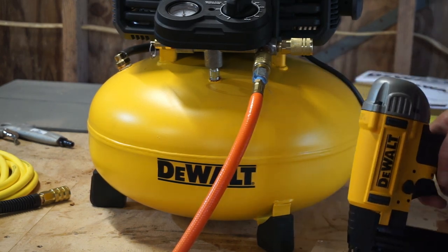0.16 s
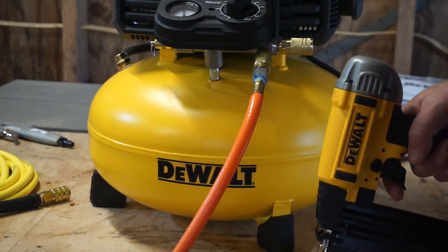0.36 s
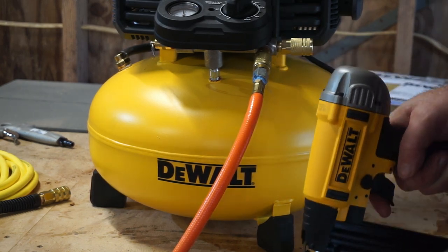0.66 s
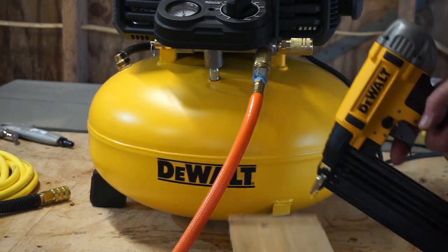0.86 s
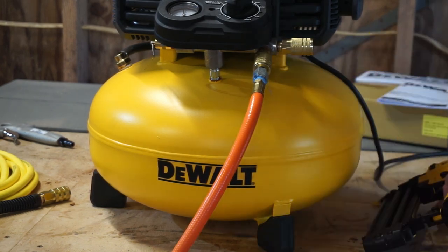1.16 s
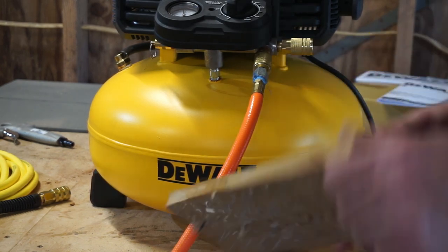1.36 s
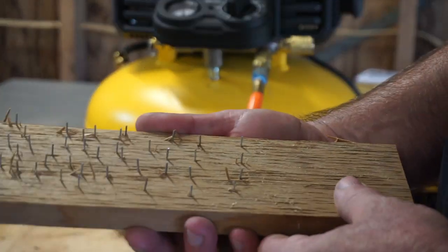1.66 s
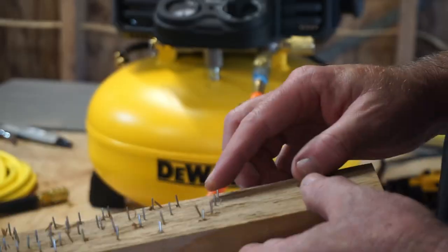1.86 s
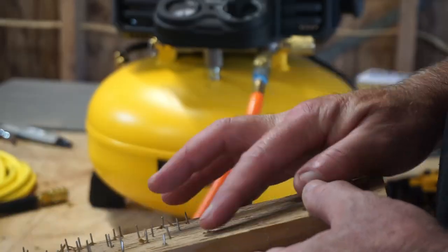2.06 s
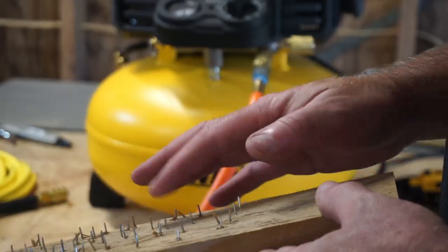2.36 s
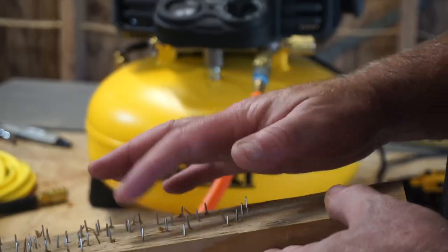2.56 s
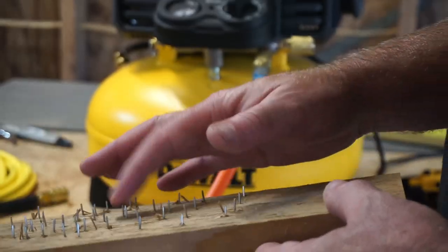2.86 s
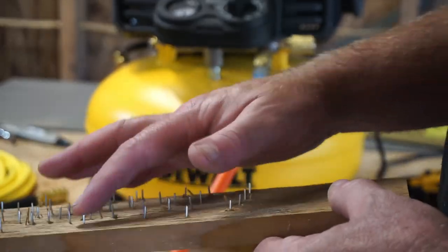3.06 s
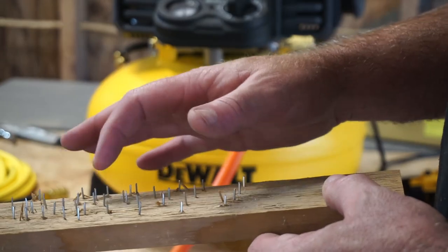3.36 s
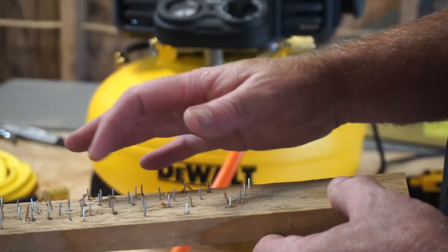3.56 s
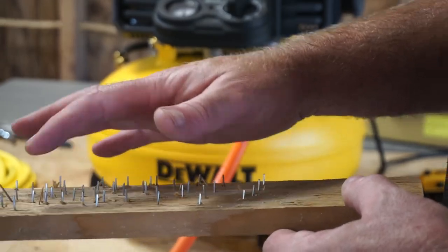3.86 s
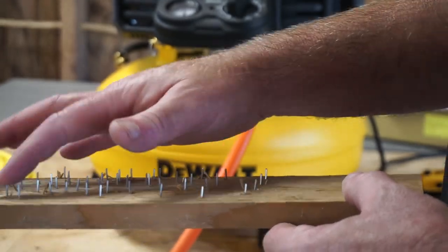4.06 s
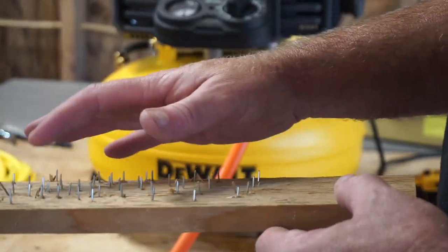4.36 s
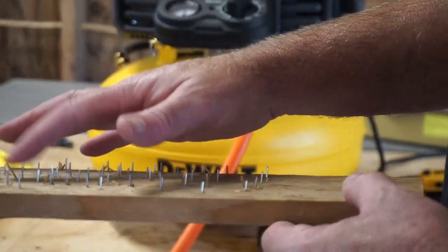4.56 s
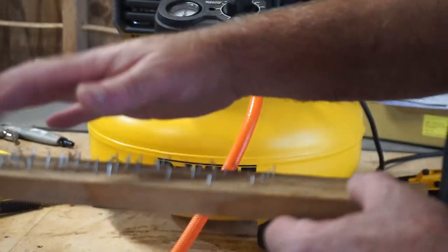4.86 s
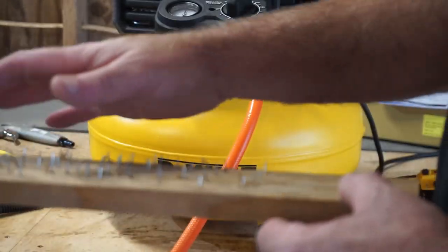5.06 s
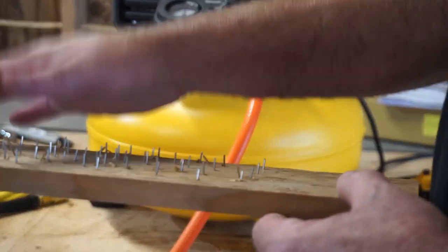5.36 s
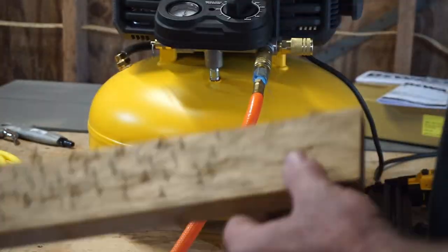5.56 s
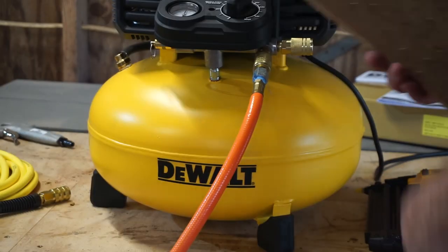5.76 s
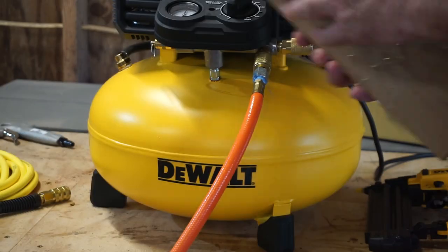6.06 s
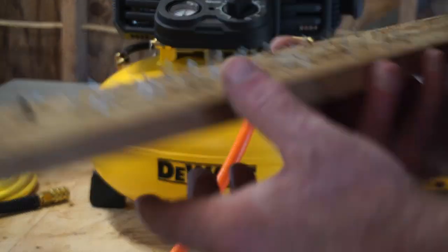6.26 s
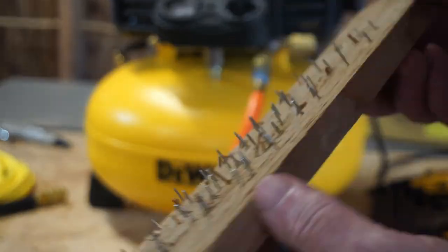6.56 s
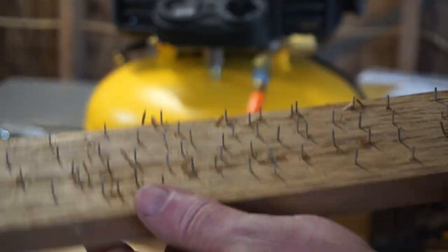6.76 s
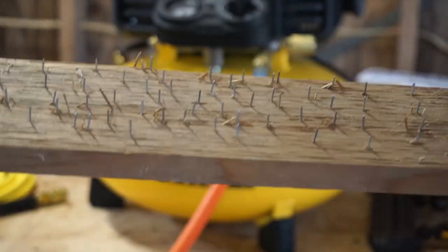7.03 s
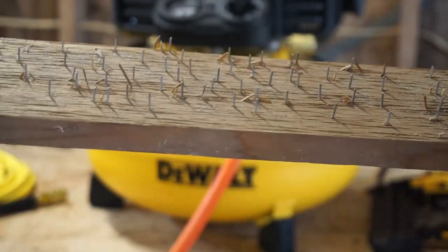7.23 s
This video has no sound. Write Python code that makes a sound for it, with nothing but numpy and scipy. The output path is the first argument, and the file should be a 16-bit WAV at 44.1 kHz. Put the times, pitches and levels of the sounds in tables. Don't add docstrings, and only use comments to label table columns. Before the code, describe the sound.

A pneumatic nail gun rattles off five sharp, hissing shots at close range, then a compressor motor kicks in and whirs steadily in a workshop.

```python
import sys
import numpy as np
from scipy import signal
from scipy.fft import rfft, irfft
from scipy.io import wavfile
from scipy.ndimage import uniform_filter1d

SR = 44100
rng = np.random.default_rng(int(sys.argv[2]) if len(sys.argv) > 2 else 0)


def wav_out(sig):
    wavfile.write(sys.argv[1], SR, np.round(np.clip(np.atleast_2d(sig).T, -1, 1) * 32767).astype(np.int16))


def invert_db(x):
    u = np.asarray(x, float) / 20
    return 10 ** u


N = 325968

# (driver blow [s], nose pressed before [s], piston home after [s],
# blow level [dB], piston return level [dB])
SHOTS = [
    (-.019, .03, .0238, -31, -28),
    (.0837, .0257, .0278, -31, -29),
    (.2122, .0325, .0258, -31.5, -27.5),
    (.3594, .0447, .0196, -33, -28),
    (.4880, .0377, .0218, -31, -28.5),
    (.608, .0285, .0223, -33.5, -28.5),
]
# (frequency [Hz], density [dB per Hz])
VALVE_TONE = [(180, -53), (300, -25), (1360, -14), (8500, -18), (10900, -16), (12300, -12), (14700, -8),
              (16000, -8)]
# (frequency [Hz], density [dB per Hz])
RETURN_TONE = [(120, -46), (200, -17), (671, -7.5), (2250, -10), (3490, 0), (4200, -6), (6880, -9),
               (9750, -13.5), (11300, -7), (16000, -11.5)]


def level(x, db):
    return x * invert_db(db) / np.sqrt(np.mean(x ** 2))


def coloured(points, peaks=()):
    hz = np.arange(N // 2 + 1) * SR / N + 1
    point_hz, point_db = np.transpose(points)
    db = np.interp(np.log(hz), np.log(point_hz), point_db)
    for centre_hz, width_hz, top_db in peaks:
        db = db + top_db / (1 + (2 * (hz - centre_hz) / width_hz) ** 2)
    return level(irfft(rfft(rng.standard_normal(N)) * invert_db(db), N), 0)


def walk(rate):
    hold = int(SR / rate)
    steps = np.repeat(rng.standard_normal(N // hold + 1), hold)
    return 1.1 * uniform_filter1d(uniform_filter1d(steps, hold), hold)[:N]


def hits(events, tone, t60, noise_db, modes=(), modes_db=0, rise=0.00013, open_s=1):
    out, noise, t = np.zeros(N), coloured(tone), np.arange(SR // 5) / SR
    port_shut_t60_s = .07
    envelope = (1 - np.exp(-t / rise)) * invert_db(-60 * np.maximum(t - open_s, 0) / port_shut_t60_s)
    for s, db in events:
        i = int(s * SR)
        burst = invert_db(noise_db) * noise[i:i + len(t)] * invert_db(-60 * t / t60)
        for hz, ring_db, ring_s in modes:
            detune, phase = rng.standard_normal(2)
            ring = np.sin(2 * np.pi * hz * (1 + 0.016 * detune) * t + 0.61 * phase)
            burst = burst + invert_db(modes_db + ring_db - 60 * t / ring_s) * ring
        out[i:i + len(t)] += invert_db(db) * burst * envelope
    return out


def nail_gun():
    # (frequency [Hz], density [dB per Hz])
    nose_tone = [(180, -33), (300, -9), (2030, -4), (3030, 6), (5610, -26), (7570, -15), (11700, -10),
                 (16000, -4)]
    drive_tone = [(59, -68), (100, -38), (1310, -22), (4020, -5), (5900, -13), (9210, -15), (11600, 2),
                  (14100, 2), (16000, -9)]
    exhaust_tone = [(290, -58), (500, -27), (3250, -14.5), (3920, -20), (5970, -13), (6330, -15),
                    (9360, -16.5), (11600, -14), (13600, -8.5), (16000, -22)]
    # (frequency [Hz], level [dB], t60 [s])
    drive_modes = [(1480, -2, 0.019), (13500, -7, .03), (5540, -16, .01)]
    return_modes = [(3320, 0, 0.028), (3740, -4, 0.017), (907, -9.5, 0.032), (2800, -9, 0.027),
                    (1790, 2, 0.005)]
    bounce_modes = [(1360, 0.9, 0.018), (1470, 0, 0.015), (3450, 0, 0.011)]
    # (frequency [Hz], level [dB], t60 [s])
    crack = [(4800, 13, .0016)]

    drive = [(s, db) for s, _, _, db, _ in SHOTS[1:]]
    nose = [(s - lead, -38.5) for s, lead, *_ in SHOTS[1:]]
    valve = [(s - .0082, -34) for s, _ in drive]
    home = [(s + lag, db) for s, _, lag, _, db in SHOTS]
    bounce = [(s + .0102, db) for s, db in home]

    gun = hits(nose, nose_tone, 0.022, -1.7)
    gun += hits(valve, VALVE_TONE, 0.042, 0.4)
    gun += hits([(s + 0.0018, db) for s, db in valve], exhaust_tone, 0.017, -13, rise=.0005)
    gun += hits(drive, drive_tone, 0.015, 5.8, drive_modes, 0.5)
    gun += hits([(s + 0.0018, db) for s, db in drive], drive_tone, .006, 3.0, rise=.0001)
    gun += hits(drive, drive_tone, .002, -6, crack, 1.5, rise=.00003)
    gun += hits(nose + home, drive_tone, .002, -6, crack, -5, rise=.00003)
    gun += hits([(0, -43)] + drive, exhaust_tone, 0.13, 1.6, rise=0.00083, open_s=.045)
    gun += hits(home, RETURN_TONE, 0.065, -0.57, return_modes, -0.3)
    gun += hits(home, exhaust_tone, 0.09, -25, rise=.003)
    gun += hits(bounce, RETURN_TONE, 0.037, -7.0, bounce_modes, -0.49, rise=0.00076)
    return gun


def orders(turn, table, wobble_db, drift):
    out = np.zeros(N)
    for k, db in table:
        phase = drift * k ** .5 * walk(30) + 1.81 * rng.standard_normal()
        out += invert_db(db + wobble_db * walk(40)) * np.cos(k * turn + phase)
    return out


def spin_up(t, age):
    # (time [s], shaft speed [Hz])
    speed = [(.9, 202.4), (1.1, 202.8), (1.4, 203.24), (2.2, 203.5), (2.5, 204.2), (3.4, 204.6),
             (3.7, 205.2), (4.3, 204.97), (5.5, 205.2), (5.8, 205.6), (6.1, 205.1), (6.4, 205.4),
             (7.0, 205.56), (7.3, 206.18)]
    gap_hz, closing_s = 78, .045
    sweep = 1 - gap_hz / speed[0][1] * np.exp(-age / closing_s)
    hz = sweep * np.interp(t, *np.transpose(speed))
    turn = 2 * np.pi * np.cumsum(hz * (1 + 0.00044 * walk(8))) / SR
    return sweep, turn


def run_shift(order, drift, t, early):
    # (multiple of shaft speed, level [dB])
    early_shifts = [(15, -4), (17, -7), (19, -6), (45, 7), (46, -8), (47, -4), (50, -5), (51, -13)]
    mid_run_s = 4
    return drift * (t - mid_run_s) + dict(early_shifts).get(order, 0) * early


def shaft_partials(t, sweep, turn, early):
    # (multiple of shaft speed, level at mid run [dB], drift [dB per s])
    partials = [(1, -19.5, 0.1), (2, -22.0, 0.0), (3, -21.0, -0.1), (4, -21.5, -2.2), (5, -7.0, -0.1),
                (6, -8.5, 0.1), (7, -18.5, -0.5), (8, 1.0, -0.2), (9, -5.0, -0.2), (10, -10.0, 0.8),
                (11, -25.5, 0.4), (12, -17.5, 0.3), (13, -10.5, -1.3), (14, -24.5, 1.6), (15, -12.5, 0.0),
                (16, -6.0, -0.6), (17, -4.5, -0.2), (18, -14.5, -0.8), (19, -11.0, 0.0), (20, -13.0, 0.4),
                (21, -16.5, -0.7), (22, -12.0, -0.8), (23, -16.0, -2.0), (24, -13.0, -0.8),
                (25, -22.5, 0.3)]
    # (multiple of shaft speed, level [dB])
    belt = [(4.5, -27)]
    k, run_db, _ = np.transpose(partials)
    standstill_db, off_peak_db = -8, -90
    shaft = []
    for n, db, drift in partials:
        resonant_db = np.maximum(np.interp(n * sweep, k, run_db), db + off_peak_db * (1 - sweep))
        shaft.append((n, resonant_db + run_shift(n, drift, t, early) + standstill_db * (1 - sweep)))
    return orders(turn, shaft + belt, .5, 0.085)


def brush_whines(t, sweep, turn, early):
    # (multiple of shaft speed, level at mid run [dB], drift [dB per s])
    partials = [(26, -20.5, 1.1), (27, -18.0, 0.5), (28, -20.0, 0.9), (29, -21.0, 0.7), (33, -21.0, 0.2),
                (35, -24.0, 2.5), (40, -20.5, 0.9), (43, -21.5, -0.8), (44, -16.0, 1.3), (45, -12.5, 0.4),
                (46, -13.5, 0.3), (47, -17.0, 0.5), (48, -22.0, 0.4), (49, -20.0, 0.5), (50, -12.0, -0.1),
                (51, -10.0, 0.6), (56, -27.0, -1.9), (62, -17.0, -2.1), (63, -15.5, -0.5),
                (64, -21.0, -3.1), (66, -23.5, -0.1), (67, -24.5, 0.9), (69, -23.0, 1.7), (71, -23.5, -0.4)]
    swell_order, swell_s, swell_width_s = 63, 3.7, 1.2
    swell_db = 11 * np.exp(-((t - swell_s) / swell_width_s) ** 2) - 4.0
    whines = []
    for n, db, drift in partials:
        whine_db = db + run_shift(n, drift, t, early) + 1.0 * walk(1.1)
        whines.append((n, whine_db + swell_db * (n == swell_order) - 300 * (1 - sweep)))
    return orders(turn, whines, 1.1, 0.22)


def cooling_air(t, turn, early):
    # (frequency [Hz], density [dB per Hz])
    air_tone = [(59, -49), (100, -41), (210, -19), (328, -34.5), (406, -23), (502, -28), (608, -20.5),
                (752, -21), (1010, -13), (1520, -13.5), (1650, -4.5), (2320, -10), (3400, -7),
                (6420, -11.5), (16000, -14.5)]
    hiss_tone = [(6500, -19), (8000, 0), (9200, -2), (10200, -7), (11000, -26)]
    # (frequency [Hz], width [Hz], level [dB])
    housing = [(1160, 410, 4), (1712, 210, 5.5), (1980, 50, -6), (3020, 56, -11), (3490, 360, 3.5),
               (4630, 700, 6), (6400, 220, -1.5), (7250, 1050, -8), (9200, 560, 5), (9200, 230, -7),
               (14300, 1500, -6), (11200, 1200, -6.5), (12900, 390, 4.5)]
    throb = 1 + .38 * np.cos(turn) + .12 * np.cos(2 * turn + 1.1)
    air = level(coloured(air_tone, housing) * throb * invert_db(.5 * walk(40)), -3.5)
    late_hiss = .095 + .04 * np.maximum(t - 4, 0)
    return air + level(coloured(hiss_tone), -12.5) * np.maximum(early, late_hiss)


def motor_start():
    # (frequency [Hz], level [dB], t60 [s])
    kick_modes = [(1650, -3, .035), (2620, -3, .04), (5600, -6, .02), (3600, -6, .02)]
    kick = hits([(.7115, -37), (.7195, -34), (.729, -29.5)], RETURN_TONE, .05, -7, kick_modes, 5)
    return kick + hits([(.709, -42)], VALVE_TONE, 0.052, 0.4)


def compressor():
    t = np.arange(N) / SR
    age = np.maximum(t - .708, 0)
    sweep, turn = spin_up(t, age)
    early = np.clip(1 - (t - 1.42) / .1, 0, 1)
    tones = shaft_partials(t, sweep, turn, early) + brush_whines(t, sweep, turn, early)
    rattle_lines = [(n, 3.5 * rng.standard_normal()) for n in range(30, 76)]
    rattle = level(orders(turn, rattle_lines, 4.8, 0.42), -14.0)
    body = cooling_air(t, turn, early) + invert_db(-4.0) * tones + rattle
    motor_db = -25 - 11 * np.exp(-(age / .038) ** 2)
    return motor_start() + invert_db(motor_db) * body * np.clip(age / 0.028, 0, 1)


def flicker():
    # (time [s], centre frequency [Hz])
    narrow = [(.975, 6600), (1.23, 5900), (1.28, 7100), (2.51, 4700), (2.65, 13100), (3.275, 5200),
              (3.555, 5200), (4.04, 4700), (5.995, 13100), (6.225, 13800), (6.665, 4700), (6.805, 4700),
              (6.805, 12400), (7.105, 5400)]
    broad = [
        .11,
        .22,
        .61,
    ]
    out, size = np.zeros(N), int(.041 * SR)
    patches = [(s, hz / 1.13, hz * 1.12, -41.5) for s, hz in narrow]
    patches += [(s, 4300, 15500, -48.5) for s in broad]
    for s, low_hz, high_hz, db in patches:
        band = signal.butter(6, [low_hz, high_hz], "band", fs=SR, output="sos")
        hiss = signal.sosfilt(band, rng.standard_normal(2 * size))
        i = int(s * SR) - size // 2
        out[i:i + size] += level(hiss[size:], db) * np.sin(np.pi * np.arange(size) / size)
    return out


def workshop():
    # (frequency [Hz], level [dB rms])
    hum_lines = [(119.8, -59), (239.6, -57), (280.6, -62.5), (359.4, -71.5), (479.5, -72.5), (561.4, -56),
                 (842, -68.5), (1123.5, -62), (1600, -66), (1965, -74)]
    # (frequency [Hz], density [dB per Hz])
    shop_tone = [(15, -37), (25, -2), (185, -16), (591, -19.5), (818, -36), (1130, 7), (2000, 10),
                 (2690, 1), (4030, 5), (5430, -0.5), (16000, -18)]
    t, hum = np.arange(N) / SR, np.zeros(N)
    for hz, db in hum_lines:
        tone = np.sin(2 * np.pi * hz * t + 9.5 * rng.random())
        hum += np.sqrt(2) * invert_db(db + 1.25 * walk(15)) * tone
    return hum + level(coloured(shop_tone), -60.5)


def scene():
    gun, t = nail_gun(), np.arange(SR // 4) / SR
    tail = signal.lfilter([.3], [1, -1.2, .4], rng.standard_normal(len(t))) * invert_db(-60 * t / 0.34)
    wet = invert_db(-53.5) * signal.fftconvolve(gun, tail)[:N]
    age = np.arange(N) / SR - np.array(SHOTS)[:, :1]
    dip_db = -14 * np.sum(np.exp(-((age - .008) / 0.008) ** 2), axis=0)
    mono = gun + wet + compressor() + invert_db(dip_db) * workshop()
    return mono + np.array([[1], [-1]]) * flicker()


def band_limit(x):
    return signal.sosfilt(signal.butter(12, 16910, fs=SR, output="sos"), x)


def record(dry):
    hz = np.arange(N // 2 + 1) * SR / N
    soft = rfft(np.tanh(4.14 * dry) / 3.754) * hz / np.hypot(hz, 45)
    stop_hz, slope_hz = 15745, 160
    top_cut = np.sin(np.pi / 2 * np.clip((stop_hz - hz) / slope_hz + .3, 0, 1)) ** 2
    return band_limit(irfft(soft * top_cut, N))


dry = scene()
out = record(dry)
wav_out(out)
```